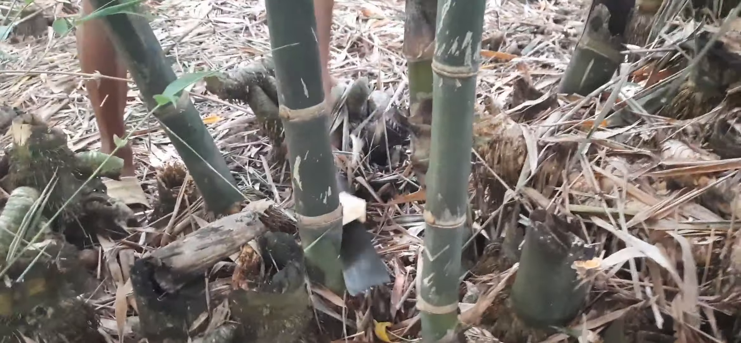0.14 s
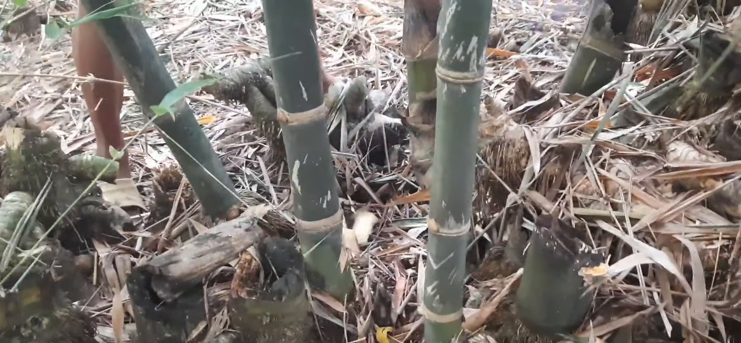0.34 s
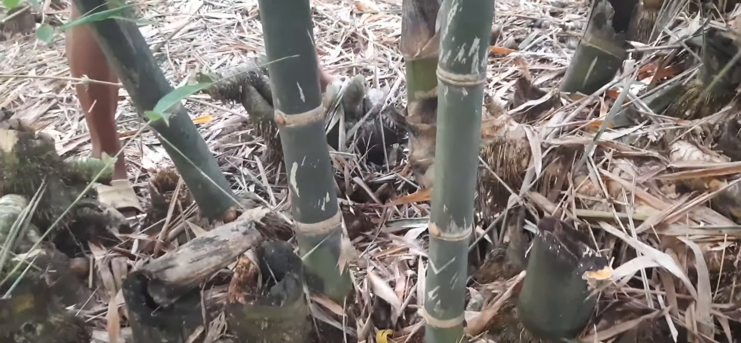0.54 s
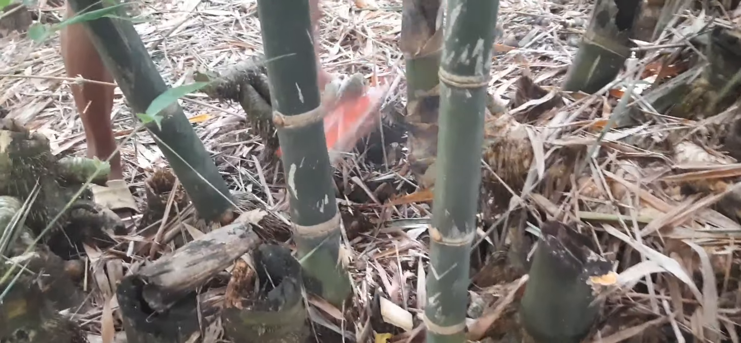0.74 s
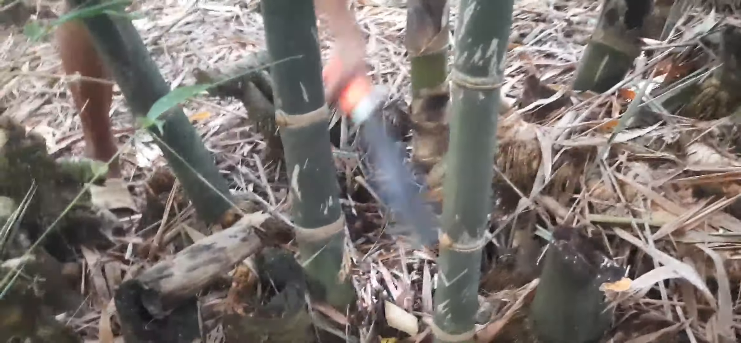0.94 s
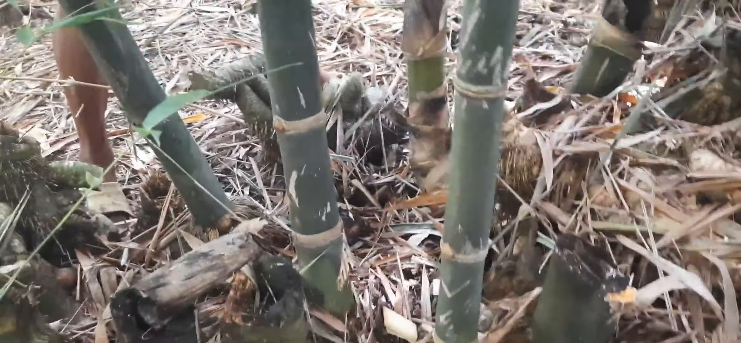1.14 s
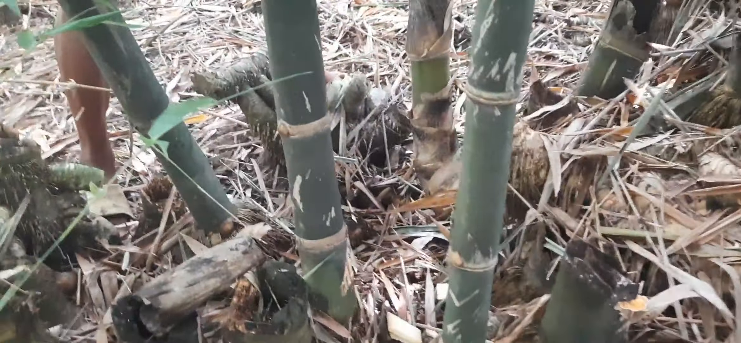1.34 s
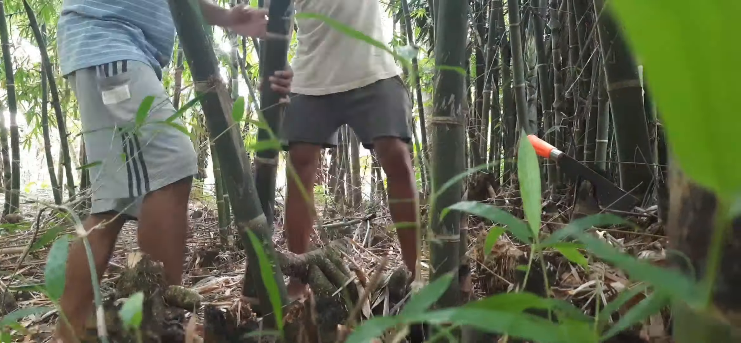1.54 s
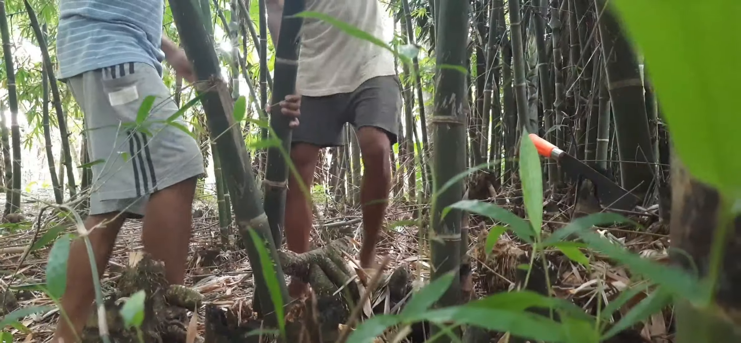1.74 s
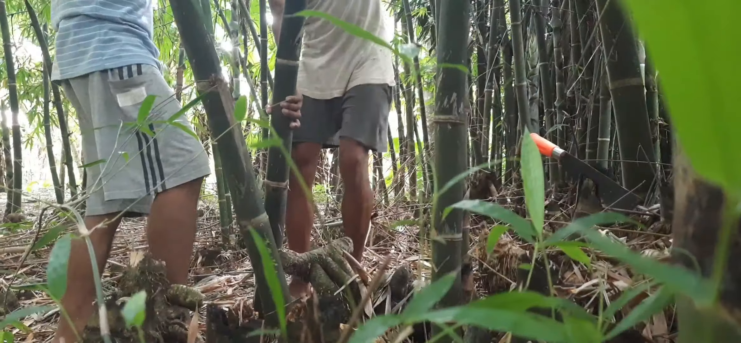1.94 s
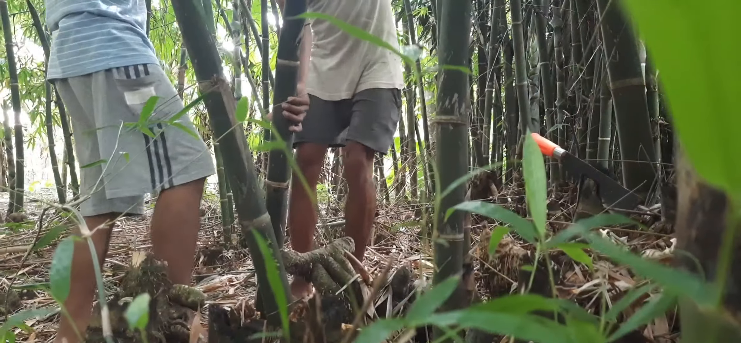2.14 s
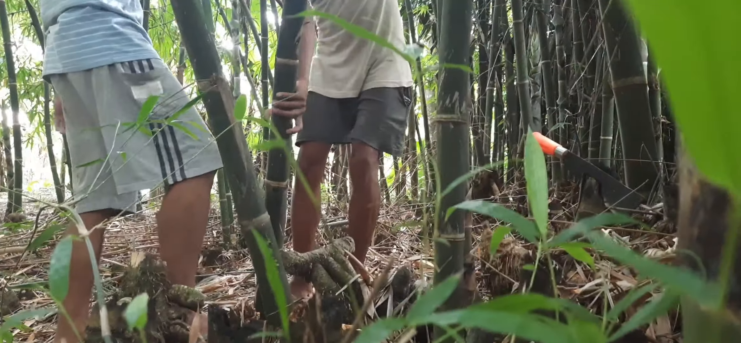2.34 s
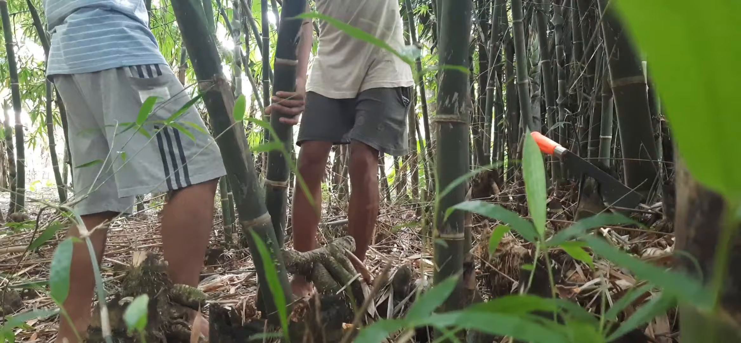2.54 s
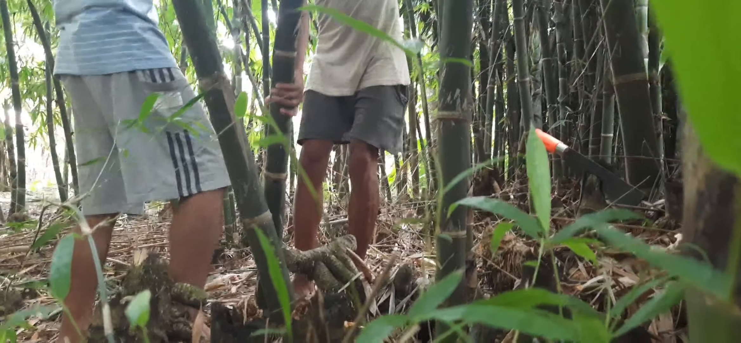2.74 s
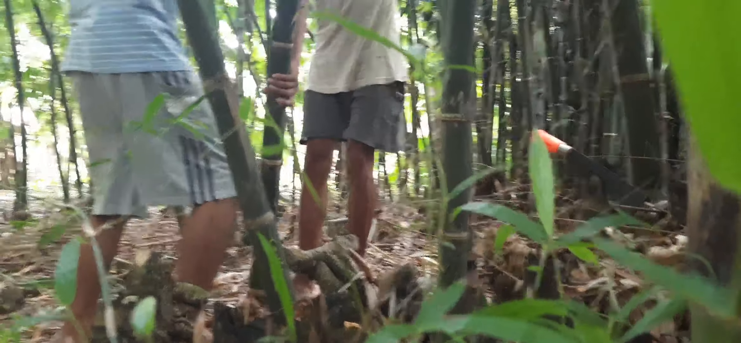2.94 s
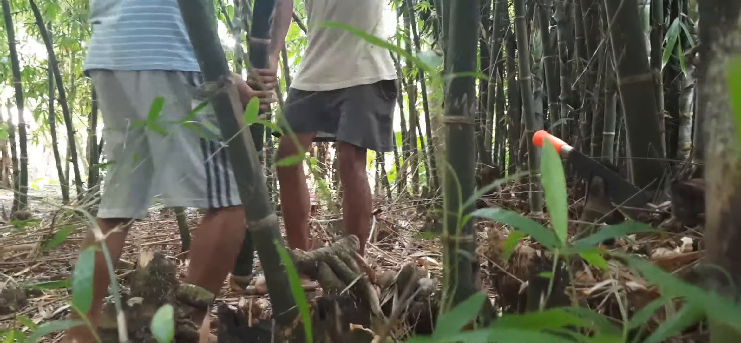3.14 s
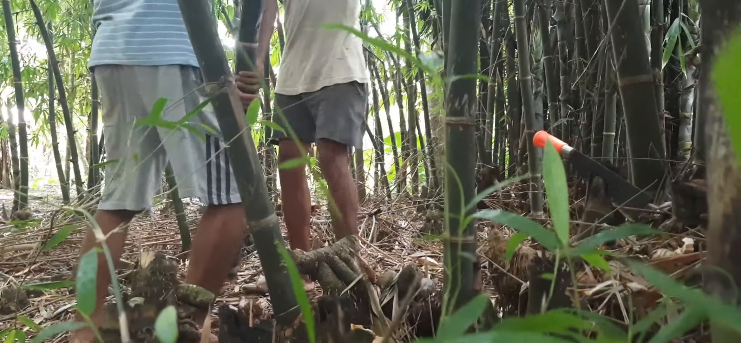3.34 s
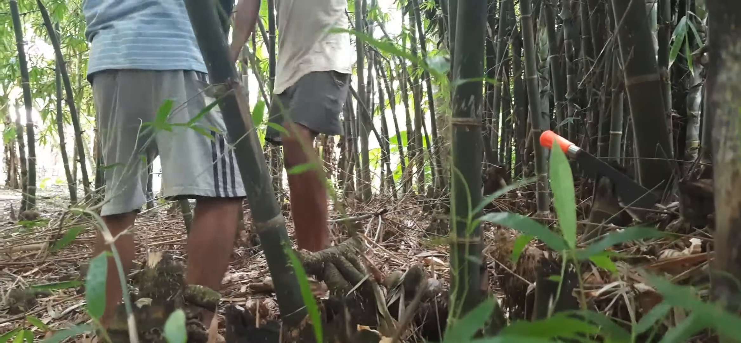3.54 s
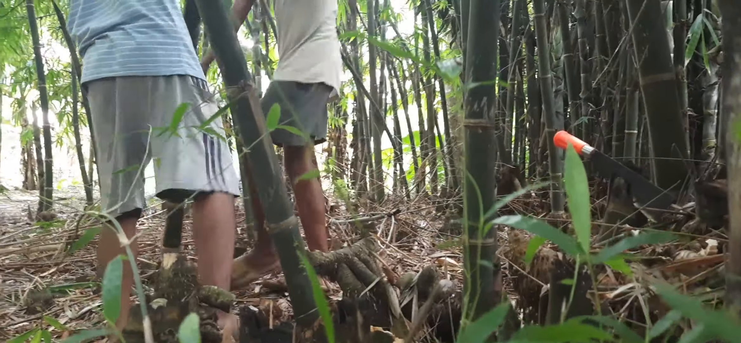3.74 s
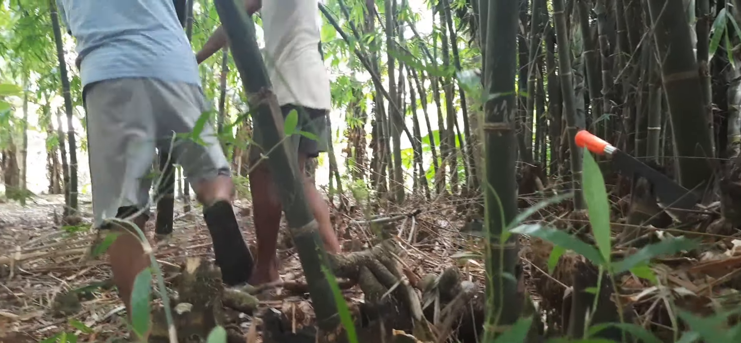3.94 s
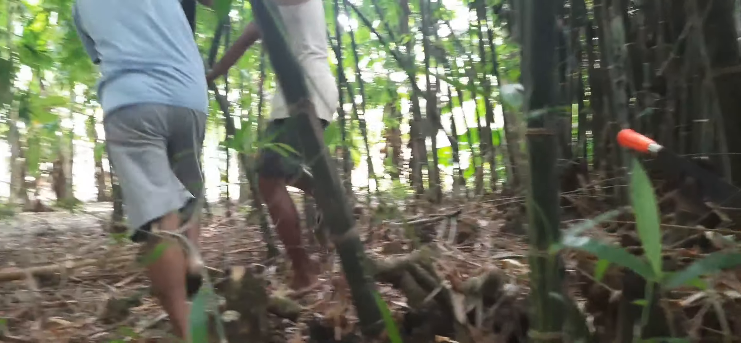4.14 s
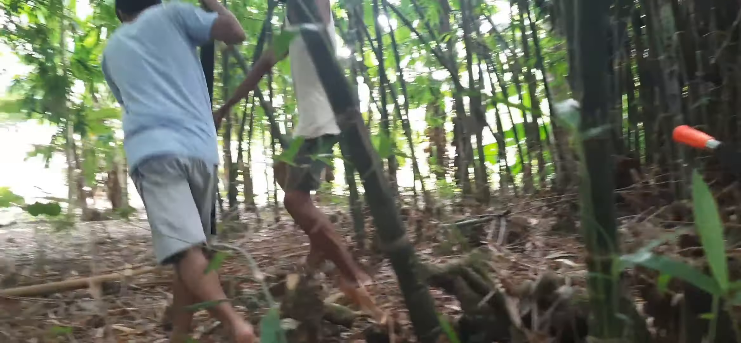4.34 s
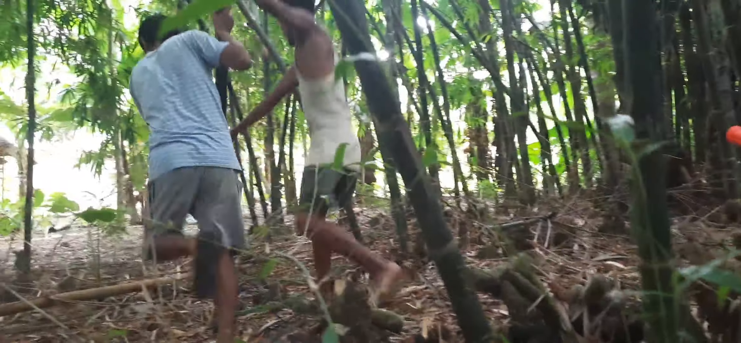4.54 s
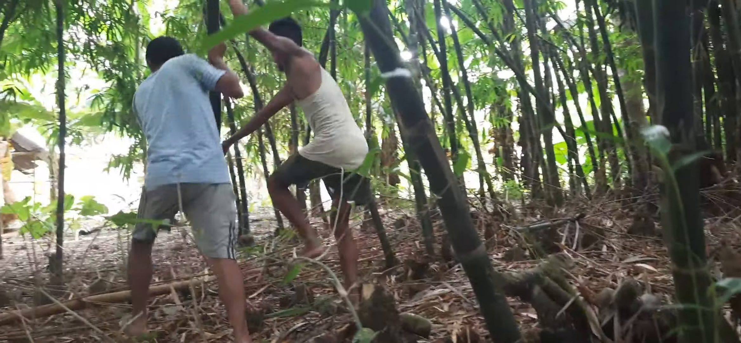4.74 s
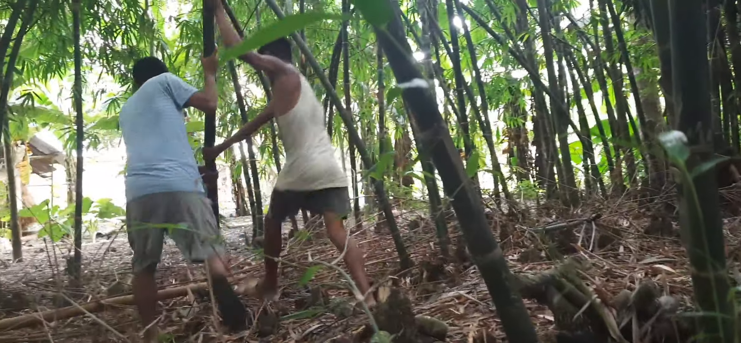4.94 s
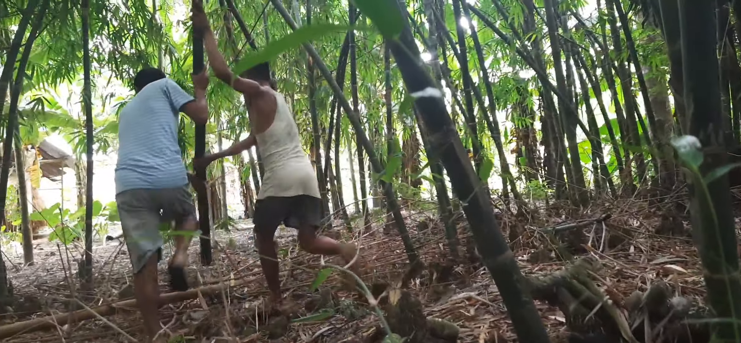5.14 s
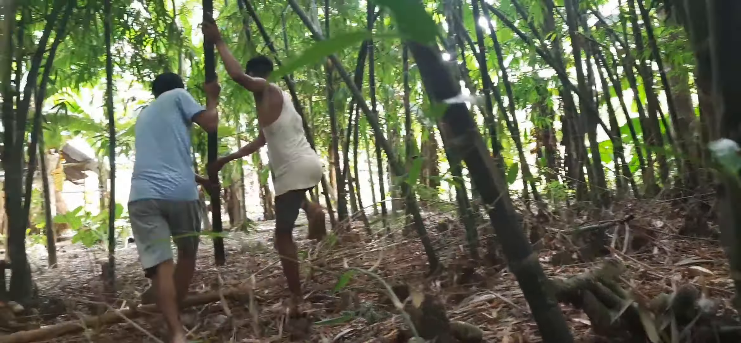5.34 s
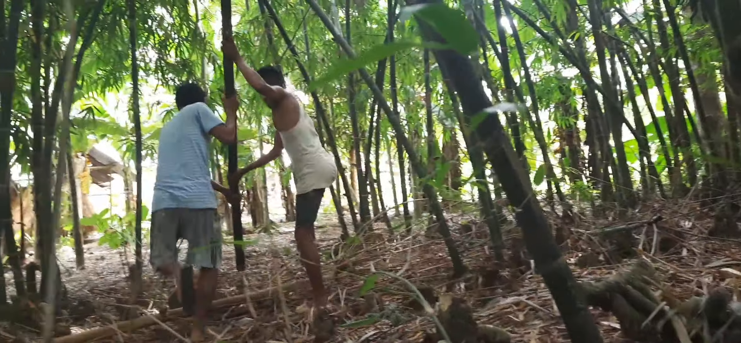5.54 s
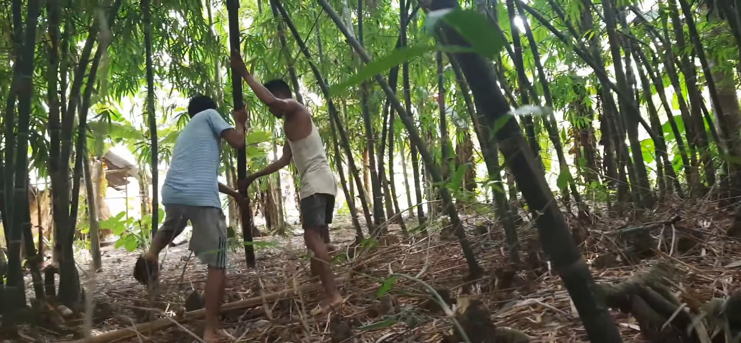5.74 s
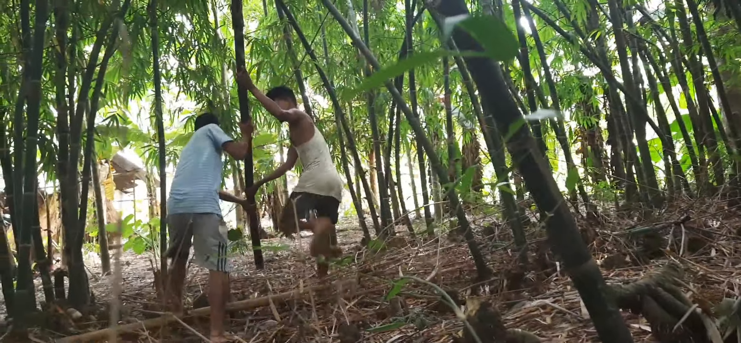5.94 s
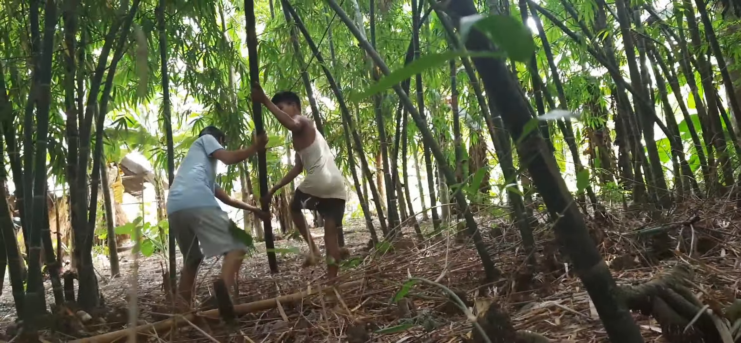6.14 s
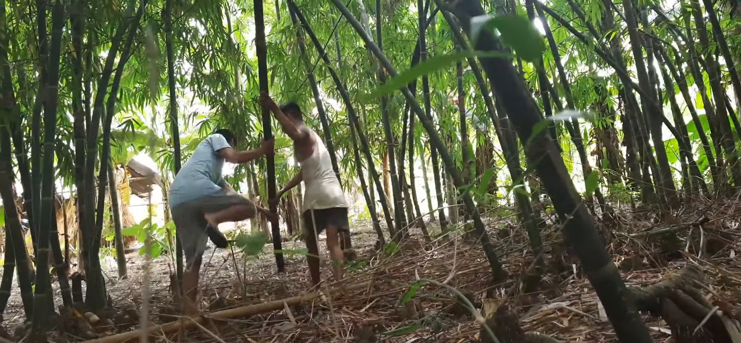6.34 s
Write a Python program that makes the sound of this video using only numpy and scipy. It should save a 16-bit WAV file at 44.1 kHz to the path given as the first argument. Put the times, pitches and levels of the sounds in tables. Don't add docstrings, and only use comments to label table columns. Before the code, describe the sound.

A blade cracks three times into hollow bamboo, then abruptly dragging, knocking stems, thrashing foliage and breaking twigs grow loud as a pole is pulled.

```python
import sys
import numpy as np
from scipy import signal
from scipy.fft import rfft, irfft, next_fast_len
from scipy.io import wavfile
from scipy.ndimage import uniform_filter1d

SR = 44100
rng = np.random.default_rng(int(sys.argv[2]) if len(sys.argv) > 2 else 0)


def voltage_ratio(decibels):
    exponent = np.asarray(decibels, float) / 20
    return 10 ** exponent


def inscribe(sig):
    pcm = np.round(np.clip(np.atleast_2d(sig).T, -1, 1) * 32767)
    wavfile.write(sys.argv[1], SR, pcm.astype(np.int16))


N = 286650
CLOCK = np.arange(N) / SR
SIZE = next_fast_len(N + SR)

# [f/Hz, colour/dB per Hz]
AIR_COLOUR = [(15, -38.5), (25, -7), (85, -1), (163, -8), (238, -5), (280, -11), (1150, -20.5), (2210, -13),
              (4130, -21), (4600, -22), (7710, -38), (12600, -22), (16500, -30)]
# [t/s, peak/dB, t60/s]
LITTER_STIRS = [
    (.57, -67, .12),
    (.65, -63.5, .5),
    (.8, -61.5, 1.2),
    (1.18, -55, 0.16),
    (1.278, -50, 0.048),
    (1.48, -74, .6),
]
# [f/Hz, colour/dB per Hz]
RUSTLE_COLOUR = [(25, -17.5), (80, -0.5), (330, -5), (1100, -6), (2350, -1.5), (2900, -5), (5700, -2),
                 (7500, -6.5), (8700, -7.5), (10400, -10.5), (12500, -1), (15000, -8.5), (16400, -9.5)]
# [t/s, level/dB, centre f/Hz, width/Hz]
BIRD_CALL = [
    (0, -50, 4970, 1630),
    (.04, -52.5, 4500, 2404),
    (.105, -57, 4480, 2594),
    (.4, -62, 3900, 887),
    (.58, -62.5, 4240, 550),
    (.68, -57.5, 4000, 700),
    (.76, -66.5, 3830, 700),
    (.81, -63, 4400, 300.4),
    (1.3, -82.5, 4300, 499),
]
# [f/Hz, t60/s, late t60/s, late level/dB]
GROVE_DECAY = [(59.9, 0.26, 1.1, -22), (160, 0.37, 1.1, -22), (420, 0.28, 0.41, -27.5),
               (1110, 0.19, 1.5, -26), (1800, 0.37, 0.56, -25.5), (3500, 0.54, 1.2, -15),
               (5600, 0.53, 2.2, -26), (8000, 0.064, 0.81, -33), (14000, 0.49, .9, -23)]
# [t/s, level/dB, centre f/Hz]
BOUGH_SWEEP = [
    (2.65, -91, 1900),
    (2.69, -68, 2010),
    (2.85, -69, 2300),
    (3.05, -67.5, 2820),
    (3.25, -59.5, 2980),
    (3.4, -82, 3090),
]
# [t/s, level/dB, f/Hz, length/s]
TWIG_SCRAPES = [(3.843, -47.5, 2040, .008), (3.904, -40, 1900, 0.0072), (3.922, -42.5, 2000, .006),
                (3.972, -45, 3020, 0.0037), (4.062, -45.5, 5040, 0.0071), (4.171, -40, 2300, .006),
                (4.232, -38.5, 1600, .006), (4.322, -39, 2210, .008), (4.339, -33.5, 2170, .006),
                (4.376, -30, 2090, .005), (5.428, -39.5, 2090, 0.003), (6.072, -30.5, 2200, .007),
                (6.172, -29, 2350, .004), (6.011, -32, 2450, 0.0025), (6.118, -35.5, 1930, .01),
                (5.938, -35, 1900, 0.0032)]
# [t/s, peak/dB, centre f/Hz]
SPLINTER_FLICKS = [(3.8583, -36, 12100), (4.0563, -25, 12000), (4.2691, -20, 11700), (4.3985, -28, 12100),
                   (4.9815, -27, 12200), (4.998, -19, 12400), (5.0326, -20, 11100), (5.0654, -18, 12800),
                   (5.485, -22, 12100), (5.6123, -25, 11100), (5.8385, -22, 10900), (5.9005, -27, 10600),
                   (5.922, -18.5, 10700), (6.0054, -13, 12500), (6.0544, -25, 11800)]
# [f/Hz, level/dB, t60/s]
TAP_MODES = [
    (806, -45.5, 0.064),
    (1000, -54, .03),
    (1460, -35.5, 0.068),
    (1870, -50, .03),
    (2253, -37, .035),
    (3770, -50, .015),
]
# [t/s, peak/dB, ring f/Hz, t60/s]
STEM_KNOCKS = [(0.954, -25, 421, 0.013), (1.278, -53, 620, 0.048), (1.785, -42.5, 368.8, 0.061),
               (1.806, -41.5, 400, .05), (1.819, -43, 1510, 0.04), (1.838, -59, 200, .03),
               (2.143, -46.5, 202, 0.085), (2.698, -49, 104.8, 0.11), (2.941, -53, 194, 0.07),
               (3.312, -37, 356, 0.066), (3.33, -48.5, 320, 0.037), (3.604, -41.5, 459, 0.043),
               (4.032, -32, 360, 0.17), (4.047, -32, 313, 0.051), (4.056, -38, 113, 0.11),
               (4.133, -35.5, 271, 0.07), (4.2669, -22.5, 1300, 0.022), (4.331, -31, 666, 0.031),
               (4.522, -32, 677, 0.046), (4.704, -25, 318, 0.046), (4.731, -58.5, 182, 0.079),
               (4.84, -29, 3710, 0.099), (4.863, -36.5, 349, 0.17), (4.943, -27.5, 108.7, 0.15),
               (4.945, -32, 260, 0.041), (5.094, -41, 377, 0.058), (5.208, -20.5, 329, 0.06),
               (5.26, -27, 300, 0.057), (5.283, -52, 259, 0.085), (5.402, -25, 335, 0.12),
               (5.524, -30, 433, 0.055), (5.584, -31.5, 345, 0.052), (5.688, -23, 344, 0.07),
               (5.917, -39.5, 338, 0.06), (5.984, -32, 385, 0.058), (6.068, -26.5, 630, 0.069),
               (6.413, -26.5, 379, 0.034)]
# [t/s, peak/dB, ring f/Hz, treble/dB]
LITTER_TICKS = [(0.57, -47, 1690, -18), (0.614, -45, 3500, -6), (0.651, -42, 4050, -13),
                (1.057, -42, 1370, -30), (1.181, -39.5, 4730, -9), (1.276, -34.5, 2370, 20),
                (1.777, -32.5, 1570, -27), (1.92, -61, 2150, -28), (2.046, -29.5, 3780, 14),
                (2.665, -44.5, 3060, -8), (3.19, -38, 2270, -8), (3.32, -36.5, 2190, -26),
                (3.361, -40, 1810, -20.5), (3.4236, -35.5, 1800, -20), (3.446, -40, 904, -22),
                (3.467, -40.5, 2120, -17), (3.523, -41.5, 3100, -18), (3.607, -37, 1110, -10),
                (3.739, -38, 1300, -25), (3.771, -30, 4400, -2), (3.792, -30, 4160, 2)]
# [t/s, peak/dB, ring f/Hz, treble/dB]
TWIG_SNAPS = [(4.007, -24, 2120, -30), (4.083, -24.5, 1920, -19), (4.119, -18, 1790, -24),
              (4.2205, -21, 1690, -11), (4.2665, -26.5, 1220, -31), (4.335, -23.5, 2120, -24),
              (4.37, -15.5, 2120, -22.5), (4.4, -24.5, 2010, -15), (4.757, -20.5, 3070, -18),
              (4.792, -19.5, 1850, -18), (4.942, -23, 866, -24), (4.981, -23, 4000, -15),
              (5.069, -13, 1960, 12), (5.211, -21.5, 2280, -25.5), (5.49, -25, 2120, -18),
              (5.609, -21, 2530, -3), (5.789, -24.5, 2300, -18), (5.922, -19.5, 2550, -22),
              (5.939, -32, 1790, -10), (5.994, -22, 1810, 1), (6.008, -22, 2500, -6),
              (6.067, -18.5, 2440, -20), (6.1687, -21, 2420, -23), (6.388, -27, 1650, -29)]
# [t/s, peak/dB, ring f/Hz, treble/dB]
TWIG_CRACKS = [(3.819, -37, 1690, -20.5), (3.888, -27, 1800, -18), (3.964, -44, 1180, -16),
               (4.04, -35, 730, -21), (4.148, -28, 710, -15), (4.168, -28.5, 2270, -20),
               (4.313, -38, 2280, -20), (4.527, -27, 1830, -22.5), (4.684, -29, 1800, -18),
               (4.886, -22.5, 2110, -18), (4.997, -31, 724, -11), (5.03, -37.5, 1040, -20),
               (5.367, -33, 2320, -20), (5.407, -32, 912, -16), (5.658, -33, 2020, -20),
               (6.045, -26, 720, -20), (6.119, -23.5, 1880, -23), (6.224, -26.5, 2380, -18)]
# [peak/dB, t60/s, shower level/dB, shower t60/s]
BRANCH_BREAK = (-5, 0.02, -20, 0.2)
# [f/Hz, colour/dB per Hz]
BRANCH_COLOUR = [(240, -38), (400, -11.5), (1760, -15), (2050, -11.5), (2470, 1), (3100, -12),
                 (4300, -16.5), (5700, -3), (7060, -15), (11900, -7.5), (16000, -11)]
# [t/s, shaking crown level/dB, drag through twigs level/dB]
HAUL_STRENGTH = [(1.6, -63, -67.5), (2.04, -56.5, -63), (2.2, -60.5, -66), (2.5, -69.5, -69),
                 (2.65, -64, -74.5), (2.72, -63, -68.5), (3.05, -62.5, -65.5), (3.27, -55.5, -62.5),
                 (3.72, -55, -58.5), (3.9, -48, -50), (4.26, -44, -45), (4.48, -45, -47.5),
                 (4.75, -39, -43.5), (4.95, -42, -43), (5.4, -41.5, -45.5), (5.75, -41, -44),
                 (6.05, -37.5, -42.5), (6.36, -43.5, -49), (6.5, -41, -43.5)]
# [t/s, level over the steady pull/dB, length/s]
CROWN_TUGS = [(3.413, -3.5, 0.024), (3.45, -1.5, 0.027), (3.557, -4.5, .025), (3.85, -1, .025),
              (3.886, 3, 0.018), (4.002, -3, 0.012), (4.207, -1, 0.02), (4.264, -2, 0.016),
              (4.462, -2, 0.025), (4.684, 1.1, 0.036), (4.782, -3.5, 0.0095), (3.748, -6, 0.011),
              (6.158, 1.5, .01), (5.164, 0, 0.026), (5.77, -3, 0.034), (5.863, -3, 0.043),
              (4.334, 2.5, 0.011), (4.565, 2, 0.032), (4.793, 2.5, 0.0055), (5.023, 6.5, 0.037),
              (5.084, 8.5, 0.025), (5.22, 0.5, 0.014), (5.608, 5.5, 0.025), (5.936, -1, 0.014),
              (6.003, 4, 0.01), (6.072, 3.5, 0.018), (6.181, 5, 0.0085)]
# [t/s, peak/dB, stem ring/dB, scatter/dB]
BLADE_BLOWS = [
    (0.114, -6, -1.5, -8),
    (0.822, -4.5, -1.8, -12),
    (1.5234, -2.5, -4.5, -16),
]
# [f/Hz, colour/dB per Hz]
SPLIT_COLOURS = [
    [(88, -45), (150, -14), (1420, -12.5), (1760, -1.5), (2000, -8.5), (2400, -3), (2900, -13),
     (4580, -9.5), (6390, -15), (7040, -31.5), (8730, -20.5), (16000, -27)],
    [(88, -32), (150, -10), (637, -13.5), (1040, -21), (1400, -13), (1690, 2.5), (1900, -7.5), (2150, 0.5),
     (2480, -3), (2750, -10.5), (3300, -6), (4580, -11), (5790, -13), (6510, -14.5), (16000, -21)],
    [(88, -33), (150, -3.5), (1040, -20.5), (1450, -9), (1900, -13), (2650, -3.5), (3420, -18.5),
     (4080, -0.5), (5300, -1.5), (6640, -6), (7770, -21), (9820, -9.5), (10800, -18), (14200, -7.5),
     (16000, -25.5)],
]
SPLIT_LENGTHS_MS = [
    3.7,
    3.7,
    3.7,
]
SPLIT_DECAYS_S = [
    .019,
    .019,
    .012,
]
# [f/Hz, t60/s, swell/s]
STEM_MODES = [(104, 0.12, 0.0063), (166, 0.12, 0.0036), (304, 0.16, 0.033), (521.5, 0.045, 0.03),
              (564, 0.072, .012), (682, 0.069, 0.015), (823.4, .07, 0.0086), (1334, 0.17, 0.013),
              (1690, 0.087, 0.0026), (1790, 0.088, .002), (2120, 0.07, .002), (2390, 0.084, 0.0047),
              (2530, 0.085, 0.0066), (4550, .04, .002)]
# [level under the peak of the blow/dB, one column a mode]
STEM_MODE_LEVELS = [
    [-22, -33, -27, -16.5, -28, -32.5, -27.5, -20, -26, -16, -21, -23.5, -17, -16.5],
    [-28.5, -32, -25, -22, -21.5, -33, -21.5, -30.5, -17.5, -26, -18.5, -21, -26.5, -26.5],
    [-20, -24, -20, -25.5, -34, -34, -21.5, -28, -26, -26.5, -22.5, -34.5, -22, -30.5],
]
# [f/Hz, colour/dB per Hz]
ECHO_COLOURS = [
    [(28, -29.5), (45, -6.5), (90, -7), (320, -6), (520, -8.5), (700, -5.5), (1100, -9), (1360, -12.5),
     (1500, -11), (1750, -3), (2100, -12), (2500, -10), (3000, -21), (3700, -15.5), (4900, -15.5),
     (6500, -20.5), (7000, -24), (16000, -36.5)],
    [(26, -43), (45, 0), (92, 0.5), (197, -5.5), (453, -6.5), (609, -11), (818, -5), (1020, -11.5),
     (1350, -10), (1700, -4), (2000, -11.5), (2450, -10), (2750, -15), (3300, -13.5), (5600, -16),
     (6100, -17), (12500, -26.5), (16000, -32)],
    [(28, -30.5), (48, 7.5), (503, -6.5), (1340, -15), (1950, -14), (3270, -13.5), (3850, -9), (4750, -13),
     (12400, -22), (16000, -28.5)],
]
# [f/Hz, shared part/0 to 1]
PORT_LIKENESS = [(25, 0), (60, 0.98), (130, 0.7), (290, 0.83), (640, 0.58), (1000, 0.58), (1500, 0),
                 (15000, 0)]
# [f/Hz, left minus right/dB]
PORT_TILT = [(25, 14), (100, -0.5), (700, 0), (1300, 2), (2400, 1.5), (4400, -7), (6000, -2.5), (7500, 1),
             (8800, 16.5), (10500, 14), (15000, -3.5)]


def along(table, hz):
    table = np.asarray(table, float)
    return np.interp(np.log(np.maximum(hz, 1)), np.log(table[:, 0]), table[:, 1])


def unit(x):
    return x / np.sqrt(np.mean(x ** 2))


def add(out, x, s):
    i = int(s * SR)
    out[:, i:i + x.shape[1]] += x[:, :N - i]


def hiss(table, lo_hz=0.91, hi_hz=SR, count=N):
    hz = np.fft.rfftfreq(count, 1 / SR) + 1
    edges = 1 / np.sqrt((1 + (lo_hz / hz) ** 6) * (1 + (hz / hi_hz) ** 6))
    noise = rfft(rng.standard_normal((2, count)))
    return unit(irfft(noise * voltage_ratio(along(table, hz)) * edges, count))


def tint(x, table):
    gain = voltage_ratio(along(table, np.fft.rfftfreq(x.shape[-1], 1 / SR)))
    return irfft(rfft(x) * gain, x.shape[-1])


def causal(gain):
    cepstrum = irfft(np.log(gain + 1e-6), SIZE)
    cepstrum[..., 1:SIZE // 2] *= 2
    cepstrum[..., SIZE // 2 + 1:] = 0
    return np.exp(rfft(cepstrum))


def ring(x, hz, t60):
    pole = np.exp(2j * np.pi * hz / SR - np.log(1000) / (max(t60, .002) * SR))
    return signal.lfilter([1], [1, -pole], x).imag


def burst(rise_s, hold_s, t60, count=8192):
    t = np.arange(count) / SR
    rise = np.minimum(t / rise_s, 1) ** 2
    return rise * voltage_ratio(-60 * np.maximum(t - rise_s - hold_s, 0) / t60)


def swells(events, rise_s):
    out = np.zeros((1, N))
    for s, db, t60 in events:
        add(out, voltage_ratio(db) * burst(rise_s, 0, t60, count=SR // 2)[None], s - rise_s)
    return out


def crackle(rate, spread_db, tail_s, bed):
    touches = rng.random(N) < rate / SR
    size = voltage_ratio(spread_db * np.minimum(rng.exponential(size=N), 2.5))
    bumps = signal.lfilter([1], [1, -np.exp(-1 / (tail_s * SR))], touches * size)
    return unit(bed + unit(bumps))


def crack(colour, shape):
    x = rng.standard_normal((2, len(shape))) * shape
    for _ in range(3):
        spectrum = rfft(x)
        x = tint(irfft(spectrum / np.abs(spectrum)), colour)
        power = uniform_filter1d(x ** 2, size=64)
        x = x / np.sqrt(power + 1e-6 * np.max(x ** 2)) * shape
    return x / np.abs(x[0]).max()


def air():
    return hiss(AIR_COLOUR, 35) * voltage_ratio(-55.5 - 11.5)


def litter():
    gain = swells(LITTER_STIRS, rise_s=.012) + voltage_ratio(-74.5)
    return hiss(RUSTLE_COLOUR, 3600) * crackle(rate=520, spread_db=12.0, tail_s=0.0022, bed=0.92) * gain


def bird():
    times, *columns = np.transpose(BIRD_CALL)
    db, hz, width = (np.interp(CLOCK, times, c) for c in columns)
    out = 0
    for band_hz in np.arange(3000, 6600, 200):
        band = ring(ring(rng.standard_normal((2, N)), band_hz, .008), band_hz, .008)
        inside = 1 / (1 + (2 * (band_hz - hz) / width) ** 8)
        out = out + unit(band) * inside / np.sqrt(width / 200)
    return out * voltage_ratio(db + 0.5) * crackle(rate=41, spread_db=2.5, tail_s=.004, bed=2.0)


def grove():
    t, out = CLOCK[:SR], 0
    rows = np.array(GROVE_DECAY)
    for hz in 32 * 2 ** np.arange(0, 9.1, .5):
        t60, late_t60, late_db = (along(rows[:, [0, k]], hz) for k in range(1, 4))
        band = hiss([(1, 0), (SR, 0)], hz / 2 ** .25, hz * 2 ** .25, count=SR) * np.sqrt(hz / SR)
        out = out + band * (voltage_ratio(-60 * t / t60) + voltage_ratio(late_db - 60 * t / late_t60))
    return out * np.minimum(t / 0.0075, 1) / 20


def sweep():
    s, db, hz = np.transpose(BOUGH_SWEEP)
    db = np.interp(CLOCK, s, db, -120, -120)
    hz = np.interp(CLOCK, s, hz)
    out = 0
    for band_hz in 1400 * 2 ** np.arange(0, 2.5, .25):
        near = lambda centre: np.exp(-(np.log2(band_hz / centre) / .3) ** 2)
        t60 = 8 / band_hz
        band = unit(ring(ring(rng.standard_normal((2, N)), band_hz, t60), band_hz, t60))
        out = out + band * (near(hz) + voltage_ratio(-4) * near(2 * hz))
    return out * voltage_ratio(db)


def tap():
    out = np.zeros((2, N))
    push = burst(.0001, 0, .0004, count=4096) * np.array([[1], [.4]])
    for hz, db, t60 in TAP_MODES:
        add(out, ring(push / push[0].sum(), hz, t60) * voltage_ratio(db), 1.7774)
    return out


def scrapes():
    out, t = np.zeros((2, N)), CLOCK[:4096]
    middle = t[2048]
    for s, db, hz, length in TWIG_SCRAPES:
        rub = unit(ring(rng.standard_normal((2, 4096)), hz, 0.0088))
        add(out, rub * np.exp(-((t - middle) / length) ** 2) * voltage_ratio(db), s - middle)
    return out


def splinters():
    out = np.zeros((2, N))
    for s, db, hz in SPLINTER_FLICKS:
        colour = [(hz / 4, -30), (hz / 1.18, -6), (hz, 0), (hz * 1.25, -4), (hz * 1.45, -20)]
        flick = crack(colour, burst(0.00019, 0.00041, 0.013, count=1024))
        add(out, flick * voltage_ratio(db - 4.0), s)
    return out


def knocks(echoes):
    out = np.zeros((2, N))
    for s, db, hz, t60 in STEM_KNOCKS:
        push = burst(0.31 / hz, 0, 0.31 / hz) * np.array([[1], [.3]])
        body = ring(push, hz, t60)
        body = body + 0.26 * ring(push, 1.9 * hz, t60 / 3) + 0.2 * ring(push, 6.2 * hz, t60 / 3)
        thud = hiss([(1, 0), (SR, 0)], hz / 2.0, hz * 1.8, count=8192)
        thud = thud * burst(0.0023, 0.0035, 1.5 * t60)
        add(out, (body / np.abs(body).max() + 0.24 * thud) * voltage_ratio(db - 6.0), s)
    return out + voltage_ratio(-11.5) * signal.fftconvolve(out, echoes, axes=1)[:, :N]


def snaps():
    out = np.zeros((2, N))
    for s, db, hz, treble_db in LITTER_TICKS + TWIG_SNAPS + TWIG_CRACKS:
        low = [(200, -24), (hz / 1.9, -9), (hz, 0), (hz * 1.32, -4)]
        high = [(6200, treble_db / 2 - 10.5), (8000, treble_db - 12.5), (15000, treble_db - 11.5)]
        colour = sorted(low + high)
        t60 = 0.036 * 2 ** (-0.1163 * (treble_db + 18.0))
        click = crack(colour, burst(0.0012, .002, t60, count=4096))
        tone = ring(click * burst(0.0013, 0.00073, 0.0019, count=4096), hz, 1.4 * t60)
        tone_gain = voltage_ratio(-12 - 0.4 * max(treble_db - 4, 0))
        add(out, (click + tone_gain * tone / np.abs(tone[0]).max()) * voltage_ratio(db - 4.5), s)
        spit_colour = [(300, -24), (hz, 0), (7000, -12), (15000, -22)]
        spit = crack(spit_colour, burst(.0001, .0001, 0.0017, count=512))
        add(out, spit * voltage_ratio(db - 4.5), s + .0005)
        answer = hiss(colour, count=8192) * burst(0.0095, 0.0044, 0.13)
        add(out, answer * voltage_ratio(db - 26.5), s)
    return out


def branch():
    s, (db, t60, shower_db, shower_t60) = 5.5284, BRANCH_BREAK
    out = np.zeros((2, N))
    add(out, crack(BRANCH_COLOUR, burst(0.00034, .0018, t60, count=4096)) * voltage_ratio(db), s)
    shower = hiss(BRANCH_COLOUR, count=16384) * burst(0.0043, 0.0092, shower_t60, count=16384)
    add(out, shower * voltage_ratio(db + shower_db), s)
    return out


def footfalls():
    events = [(s, db - 27.5 - 6 * np.log2(hz / 300), 0.33) for s, db, hz, _ in STEM_KNOCKS]
    return swells(events, rise_s=0.0067)


def haul():
    times, *columns = np.transpose(HAUL_STRENGTH)
    crown_db, drag_db = (np.interp(CLOCK, times, c) for c in columns)
    tug_db = sum(db * np.exp(-((CLOCK - s) / length) ** 2) for s, db, length in CROWN_TUGS)
    tread = footfalls()
    jolts = crackle(rate=45, spread_db=2, tail_s=.006, bed=5.5)
    ground_gain = tread + voltage_ratio(-58 + 0.42 * (drag_db + 44.5))
    stems_gain = 0.2 * tread + voltage_ratio(-53 + 3.0 + 1.26 * (drag_db + 46) + 1.1 * tug_db)
    twigs_gain = voltage_ratio(drag_db + 0.79 * tug_db + 1.5)
    leaves_gain = voltage_ratio(crown_db + tug_db + 0.43)
    ground = hiss(RUSTLE_COLOUR, 36, 288) * crackle(rate=10, spread_db=4.0, tail_s=0.017, bed=3.0)
    stems = hiss(RUSTLE_COLOUR, 250, 1175) * crackle(rate=34, spread_db=3.5, tail_s=0.02, bed=1.2)
    twigs = hiss(RUSTLE_COLOUR, 1250, 3100) * crackle(rate=330, spread_db=4.0, tail_s=0.013, bed=1.0)
    leaves = hiss(RUSTLE_COLOUR, 3000) * crackle(rate=190, spread_db=4.5, tail_s=0.0027, bed=3.7)
    return ground * ground_gain + jolts * (stems * stems_gain + twigs * twigs_gain + leaves * leaves_gain)


def chops(echoes):
    out = np.zeros((2, N))
    for k, (s, db, ring_db, scatter_db) in enumerate(BLADE_BLOWS):
        shape = burst(.0005, SPLIT_LENGTHS_MS[k] / 1000 - .0005, SPLIT_DECAYS_S[k])
        add(out, crack(SPLIT_COLOURS[k], shape) * voltage_ratio(db + 2.0), s + .0005)
        for (hz, t60, swell_s), gain_db in zip(STEM_MODES, STEM_MODE_LEVELS[k]):
            wobble = 1 + .4 * unit(uniform_filter1d(rng.standard_normal((2, 8192)), size=160))
            phase = 2 * np.pi * (hz * CLOCK[:8192] + rng.random((2, 1)))
            mode = np.sin(phase) * wobble * burst(swell_s, 0, t60)
            add(out, mode * voltage_ratio(db + gain_db + ring_db), s)
        add(out, tint(echoes, ECHO_COLOURS[k]) * voltage_ratio(db + scatter_db + 33.5), s)
    return out


def scene():
    before = np.clip((1.573 - CLOCK) / 0.011, 0, 1)
    echoes = grove()
    chopping = air() + litter() + bird() + chops(echoes)
    contacts = sweep() + tap() + scrapes() + splinters() + knocks(echoes) + snaps() + branch()
    both = rfft(chopping * before + haul() * (1 - before) + contacts, SIZE)
    share = np.clip(along(PORT_LIKENESS, np.fft.rfftfreq(SIZE, 1 / SR)), 0, 1)
    mid, side = both * causal(np.sqrt(np.array([1 + share, 1 - share])))
    return irfft(np.array([mid + side, mid - side]), SIZE)[:, :N]


def low_pass(x, top_hz):
    return signal.sosfiltfilt(signal.ellip(12, .1, 90, top_hz, fs=SR, output="sos"), x)


def top_cut(x):
    return signal.sosfilt(signal.butter(12, 16700, fs=SR, output="sos"), x)


def record(dry):
    tilt_db = along(PORT_TILT, np.fft.rfftfreq(SIZE, 1 / SR)) / 2
    port_gain = causal(voltage_ratio(np.array([tilt_db, -tilt_db]) - 0.5))
    x = irfft(rfft(dry, SIZE) * port_gain, SIZE)[:, :N]
    x = signal.sosfilt(signal.butter(4, 36, "high", fs=SR, output="sos"), x)
    rounded = 1.1 * np.tanh(x / 1.1)
    steady, wide = low_pass(rounded, 15800), low_pass(rounded, 16600)
    is_loud = 1. * (np.abs(x).max(axis=0) > .5)
    near_loud = uniform_filter1d(uniform_filter1d(is_loud, size=160), size=160)
    loud = np.minimum(100 * near_loud, 1) / 4
    return top_cut(steady + loud * (wide - steady))


dry = scene()
out = record(dry)
inscribe(out)
```